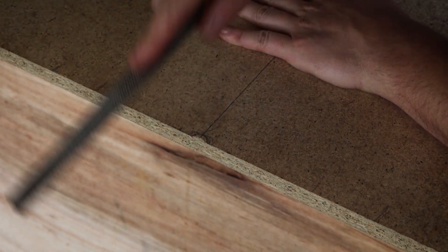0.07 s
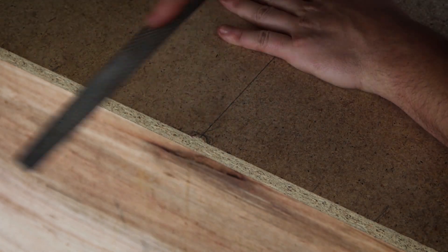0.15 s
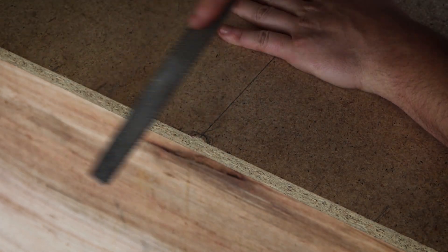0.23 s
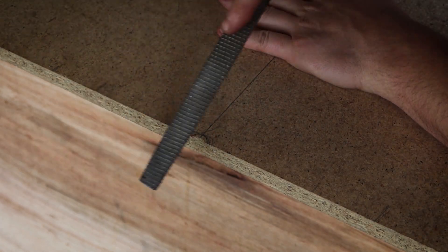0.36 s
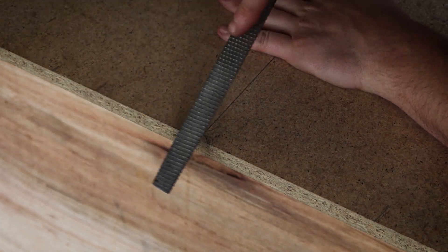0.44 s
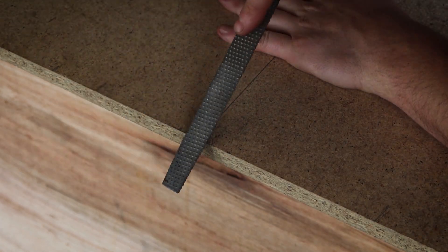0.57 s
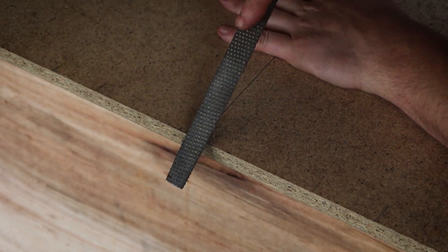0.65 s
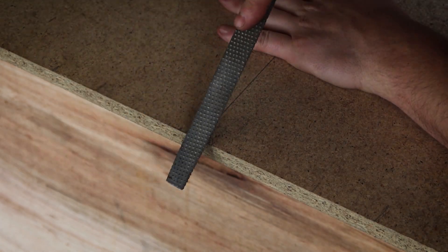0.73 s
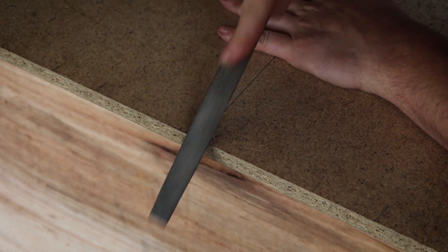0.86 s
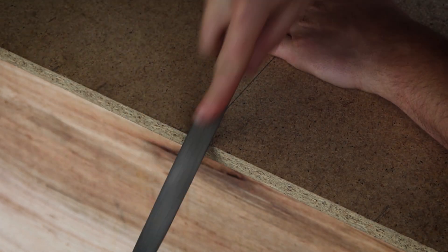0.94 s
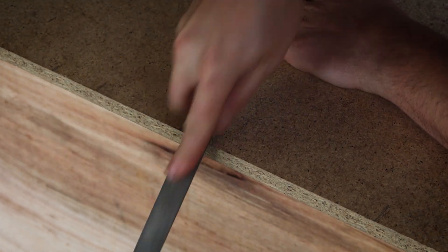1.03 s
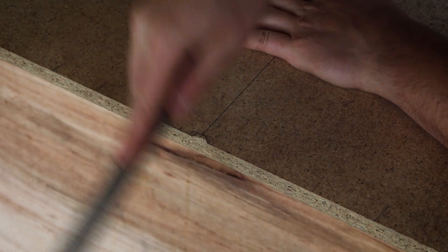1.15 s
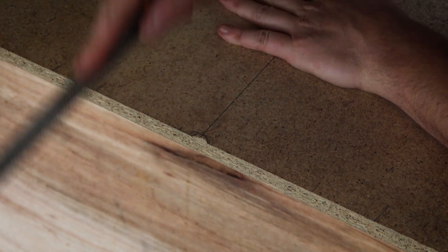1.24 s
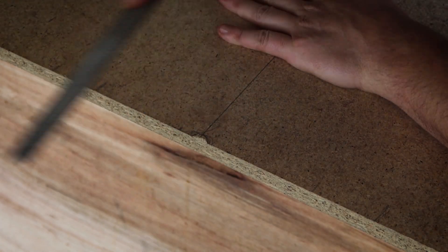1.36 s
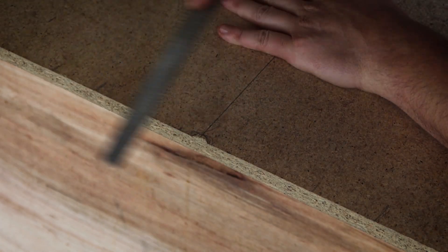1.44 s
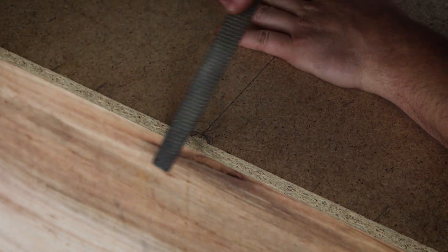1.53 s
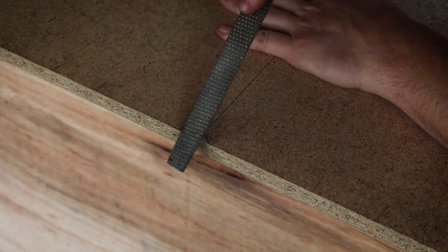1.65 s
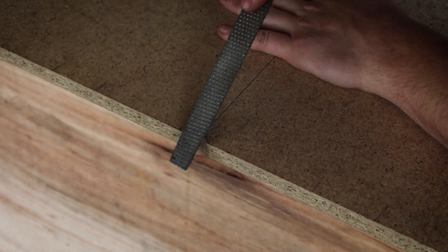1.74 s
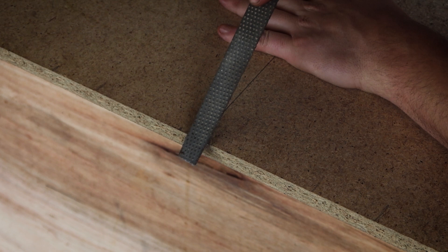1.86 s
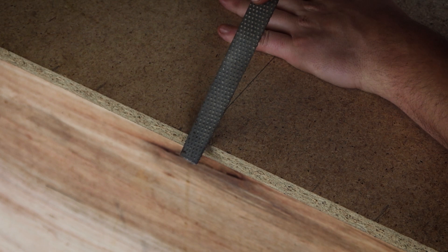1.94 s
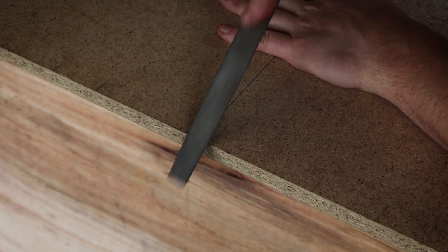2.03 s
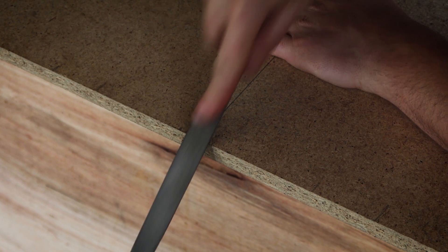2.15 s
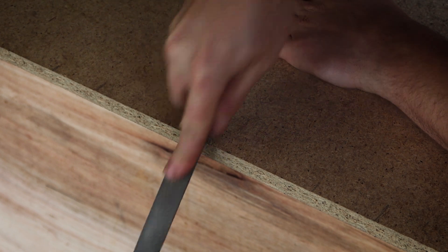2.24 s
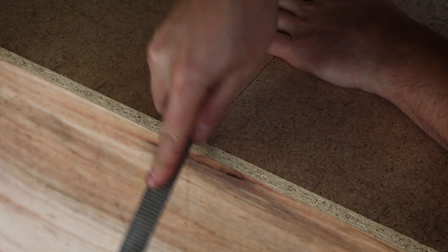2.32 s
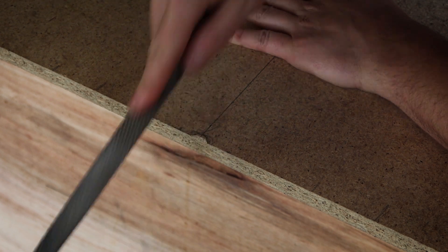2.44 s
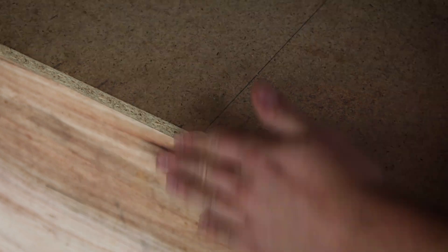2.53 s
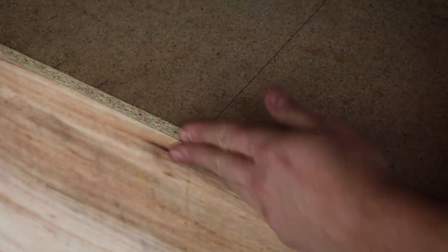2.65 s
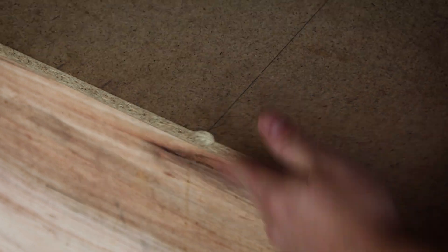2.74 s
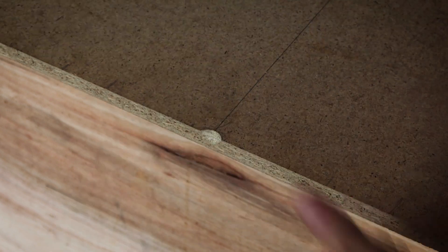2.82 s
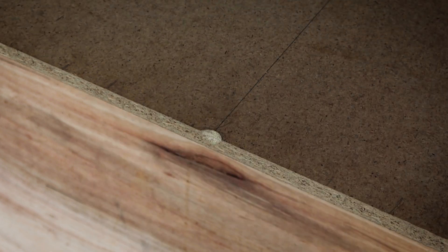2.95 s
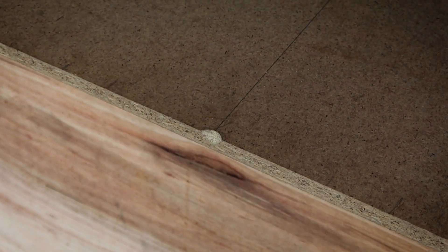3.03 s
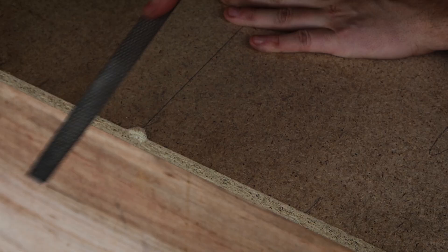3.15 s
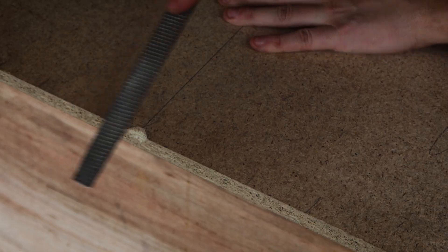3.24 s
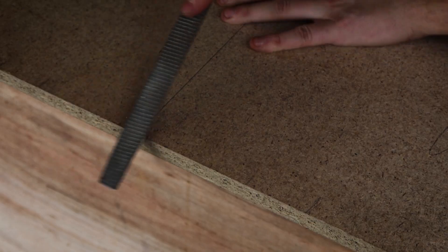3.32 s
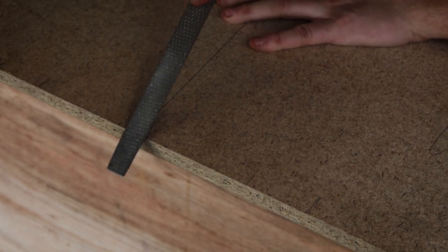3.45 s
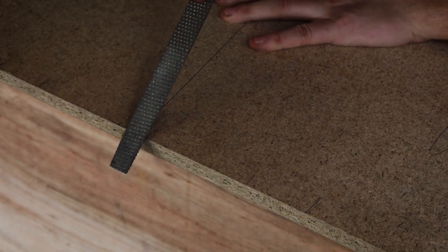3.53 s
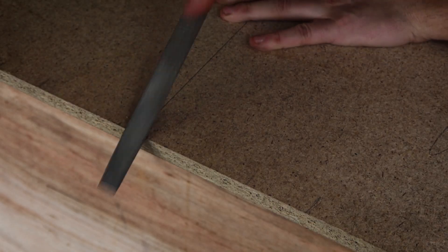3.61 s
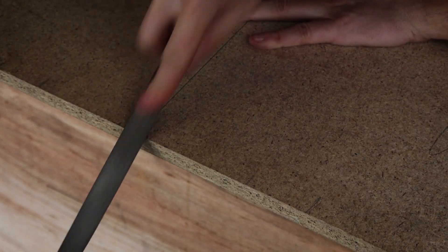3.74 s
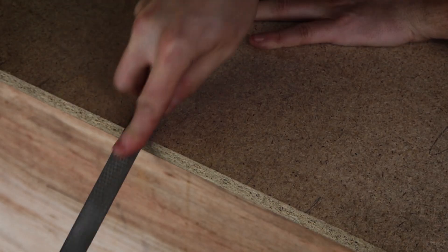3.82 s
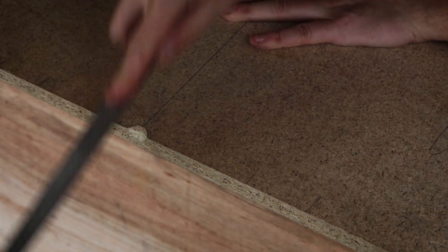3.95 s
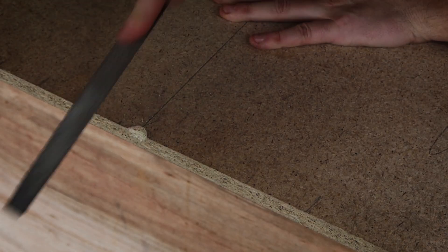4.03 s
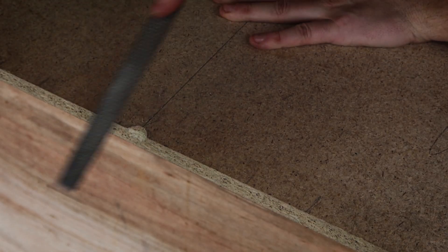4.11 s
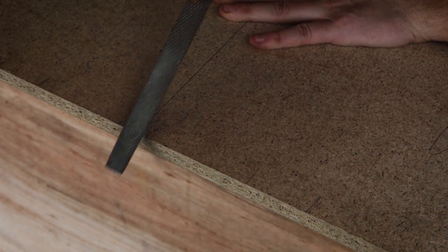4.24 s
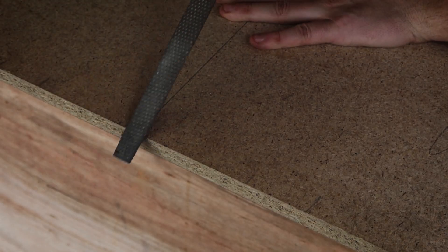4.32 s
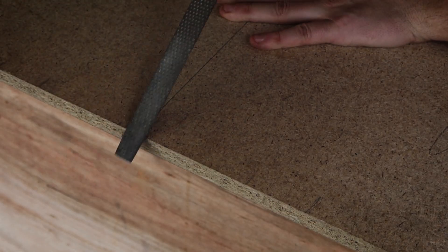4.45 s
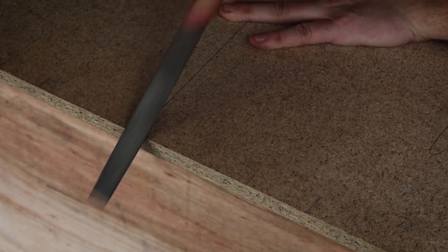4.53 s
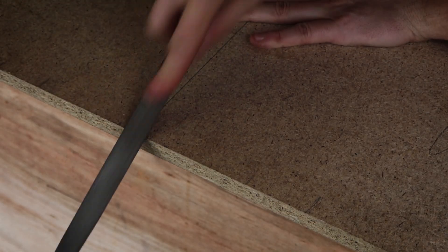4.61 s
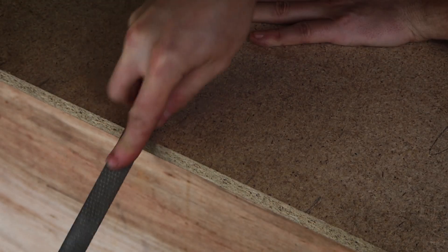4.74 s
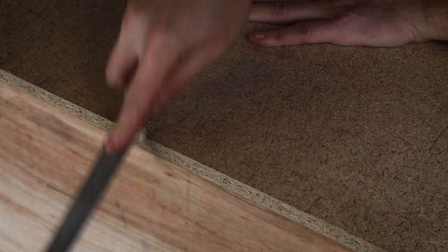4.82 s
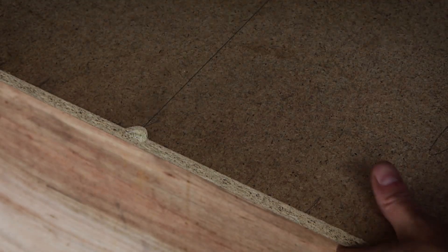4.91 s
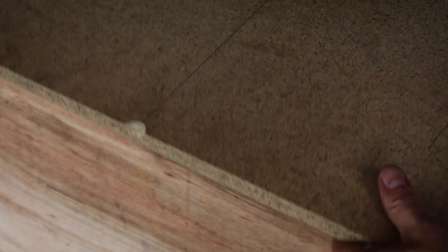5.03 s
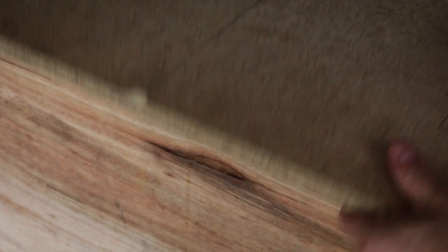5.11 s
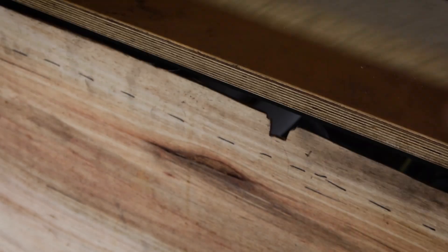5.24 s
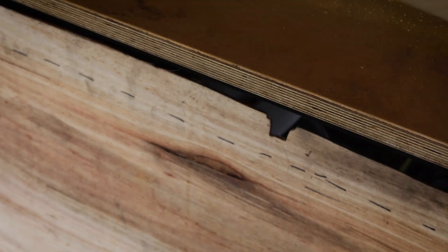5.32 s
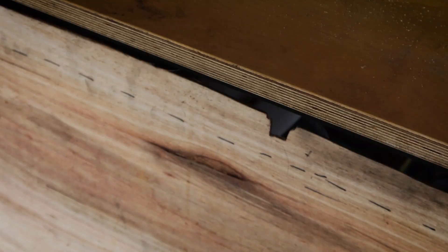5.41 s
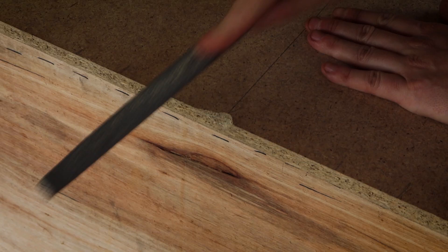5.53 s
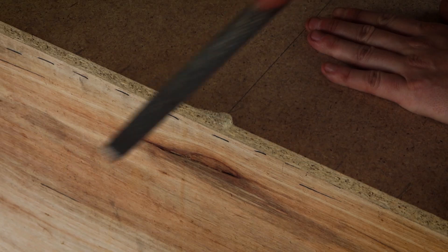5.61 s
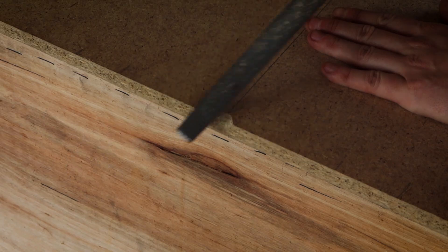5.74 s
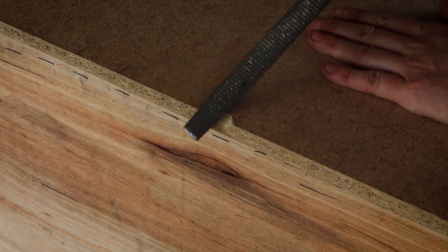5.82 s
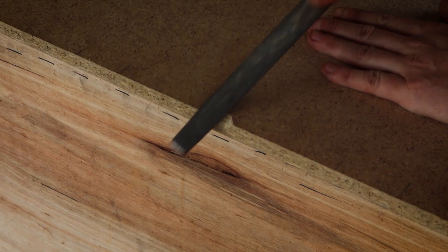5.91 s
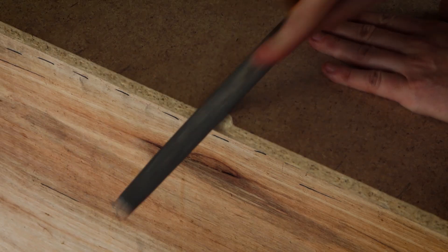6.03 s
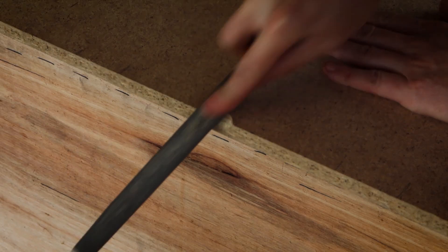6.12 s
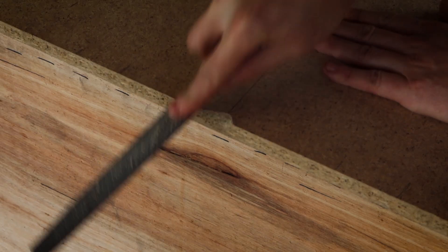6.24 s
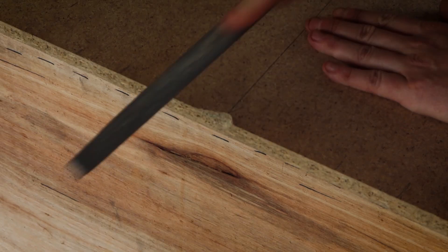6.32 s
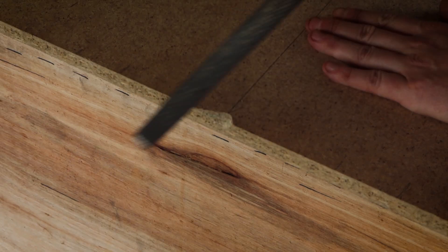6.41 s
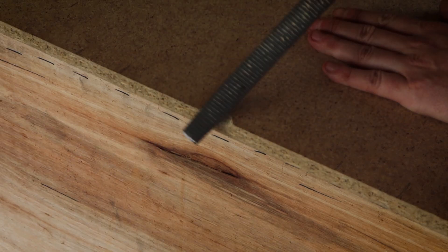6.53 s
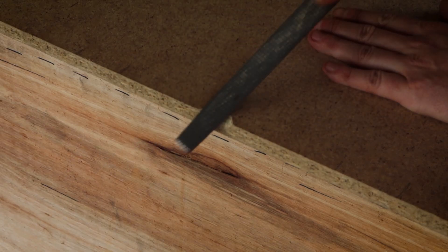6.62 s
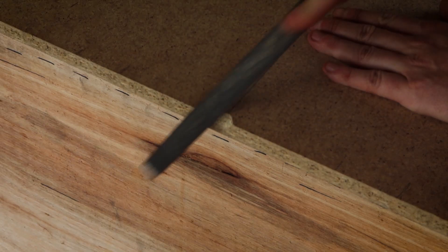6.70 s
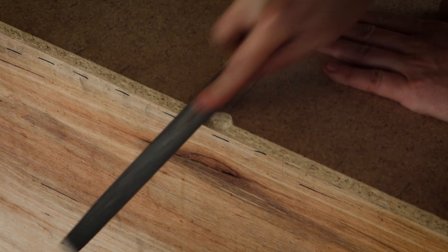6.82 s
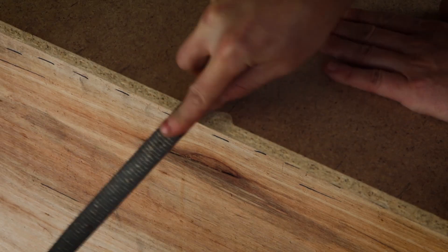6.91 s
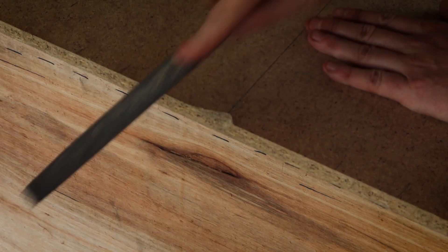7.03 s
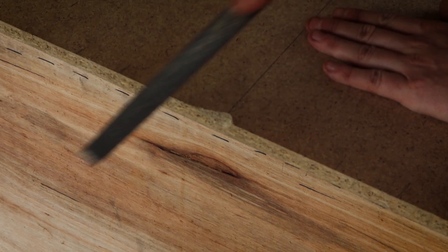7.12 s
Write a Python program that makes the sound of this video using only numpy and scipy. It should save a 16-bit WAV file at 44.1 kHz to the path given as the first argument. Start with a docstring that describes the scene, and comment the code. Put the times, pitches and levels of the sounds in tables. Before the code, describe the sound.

Close up in a small workshop with low room air and a faint thin electrical whine, the end of a rasp stroke cuts off at 0 s. Light touches and a faint drag at 0.6-0.8 lead to a loud, gritty stroke at 0.9-1.15, teeth buzzing and wood crunching, the blade's low hum sinking. Small taps and scuffs from 1.75 precede a second stroke at 2.05-2.35. A small clack at 2.64, a short slide, and a hard bright clack at 2.85 put the tool down. A scuff at 3.2 and a sharp knock at 3.44 lead to strokes at 3.65 and 4.55, ending in a dull thump. Another clack at 4.97, then rubbing, hissing slides and hollow bumps from 5.1 to 5.7. A clack at 5.86 and a light drag introduce two more irregular, tearing strokes at 5.95 and 6.7, the last fading into brief reverberation by about 7.1.

```python
"""Hand rasp on a board edge

A coarse hand rasp is set on the edge of a wooden board and pushed across it in six strokes, in a small workshop;
the tail of an earlier stroke opens the scene. Rows of teeth knock the board, crush the wood, snap its fibres and
set the blade humming. Twice the rasp is put down on the bench, and things slide, bump and tick there.
The close microphone overloads on the hardest blows and adds a faint electrical whine."""
import sys
import numpy as np
from scipy import signal
from scipy.fft import rfft, irfft
from scipy.io import wavfile
from scipy.ndimage import uniform_filter1d

SR = 44100
rng = np.random.default_rng(int(sys.argv[2]) if len(sys.argv) > 2 else 0)


def dump_mix(stems):
    """Bounce the given channels to the path in sys.argv[1] as a 16-bit WAV at rate SR."""
    frames = np.atleast_2d(stems).T  # one column per channel
    limited = np.clip(frames, -1, 1)  # hard clip at full scale
    pcm = np.round(limited * 32767).astype(np.int16)
    wavfile.write(sys.argv[1], SR, pcm)


N = 315976  # samples

EDGE_HZ = 16000  # upper band limit
TAPS = 8192  # samples, the grid on which colours are drawn
HZ = np.fft.rfftfreq(TAPS, 1 / SR) + 1
BLOW = np.sqrt(SR / 100)  # gives a response of energy 1 an rms of 1 over 10 ms
TOUCH_S = .003  # the rasp's touch sets in and lets go this quickly
COAST_S = .025  # the rasp has slowed to a crawl this long after the hand lifts
# moving level of the background: time_s [s], air_db [dB], whine_db [dB]
BACKGROUND_LEVELS = [(0, 2, 0), (1.7, 2.5, 1), (3.3, 3.5, 1.5), (3.899, -2, -12), (4.3, -0.5, -3.5),
                     (7.16, -2, -5)]


def amp(db):
    """Decibels to gain."""
    return 10 ** (np.asarray(db) / 20)


def evened(x):
    """Scales to rms 1."""
    return x / np.sqrt(np.mean(x ** 2) + 1e-20)


def read(points, hz):
    """Reads a curve of (Hz, value) points on a log-frequency axis."""
    f, value = np.transpose(points)
    return np.interp(np.log(hz + 1), np.log(f + 1), value)


def add(mix, s, sound):
    """Adds a sound at a time in seconds."""
    part = mix[max(round(s * SR), 0):][:len(sound)]
    part += sound[:len(part)]


def gate(t, attack_s, release_s):
    """Straight attack, hold and release."""
    return np.clip(np.minimum(t / attack_s, (t[-1] - t) / release_s), 0, 1)


def below(hz, order=4):
    """Low-pass slope in dB."""
    return -10 * np.log10(1 + (HZ / hz) ** (2 * order))


def above(hz, order=4):
    """High-pass slope in dB."""
    return -10 * np.log10(1 + (hz / HZ) ** (2 * order))


def resonances(modes, narrowest_hz=45):
    """Peaks and gaps in dB, none narrower than the limit."""
    return sum(lift_db / (1 + (2 * (HZ - hz) / max(width_hz, narrowest_hz)) ** 2)
               for hz, width_hz, lift_db in modes)


def ring(db):
    """Causal (minimum-phase) impulse response of energy 1 with the given colour."""
    log_gain = np.log(amp(np.maximum(db - db.max(), -100)))
    circle = np.concatenate([log_gain, log_gain[-2:0:-1]])
    response = np.fft.ifft(np.exp(np.conj(signal.hilbert(circle)))).real[:TAPS // 2]
    return response / np.linalg.norm(response)


def clicks(count, per_s, spread_db):
    """Random clicks of uneven size."""
    sizes = amp(spread_db * np.clip(rng.standard_normal(count), -2.5, 2.5))
    return (rng.random(count) < per_s / SR) * sizes


def signed_clicks(count, per_s, spread_db):
    """Random clicks that push either way."""
    return clicks(count, per_s, spread_db) * rng.choice([-1, 1], count)


def clumps(count, depth_db, size):
    """A gain that catches and lets go at random, in clumps of the given size in samples."""
    drift = evened(uniform_filter1d(rng.standard_normal(count), size))
    return evened(amp(depth_db * np.clip(drift, -2, 2)))


def steadied(x, size=2200):
    """Evens out the level over a few hundredths of a second (size in samples)."""
    return x / np.sqrt(abs(uniform_filter1d(x ** 2, size)) + 0.012 * np.mean(x ** 2) + 1e-12)


def room_air(t):
    """Low room air: noise with a dark colour, its level drifting."""
    # colour of the air: hz [Hz], level_db [dB]
    air_colour = [(15, -40.5), (25, -15), (45, -1.5), (111, -0.5), (137, -9.5), (190, -5), (326, -5.5),
                  (373, -7.5), (463, -12.5), (545, -10), (1160, -23), (2990, -29.5), (16000, -47)]
    time_s, air_db, _ = np.transpose(BACKGROUND_LEVELS)
    colour = amp(read(air_colour, np.fft.rfftfreq(N, 1 / SR)))
    air = evened(irfft(rfft(rng.standard_normal(N)) * colour, N))
    return air * amp(-51 + np.interp(t, time_s, air_db))


def electrical_whine(t, whine_hz=500):
    """The thin electrical whine of the microphone: steady harmonics of random phase, swelling and sinking."""
    # partials of the whine: hz [Hz], level_db [dB rms before the moving level]
    partials = [(500, -85), (1500, -77), (3000, -78), (6000, -80), (8000, -85), (9500, -93), (15000, -99)]
    time_s, _, whine_db = np.transpose(BACKGROUND_LEVELS)
    whine = np.sqrt(2) * sum(amp(read(partials, hz)) * np.sin(2 * np.pi * (hz * t + rng.random()))
                             for hz in np.arange(whine_hz, EDGE_HZ, whine_hz))
    return whine * amp(np.interp(t, time_s, whine_db))


def room(x, delay_s=0.011):
    """Dense reflections of random sign, each band dying at its own speed."""
    # reverberation time: hz [Hz], t60_s [s]
    decay_times = [(150, 0.41), (400, 0.37), (1000, 0.52), (2800, 0.62), (7000, 0.42), (15000, 0.26)]
    # colour of the reverberation: hz [Hz], level_db [dB]
    tail_colour = [(80, 8.5), (300, 4.5), (900, 1.5), (2500, -3), (5000, -3), (9000, -3), (16000, -2)]
    taps = rng.choice([-1., 1.], SR) * (rng.random(SR) < 4000 / SR)
    taps = taps * (np.arange(SR) > delay_s * SR)
    hz, t, bands = signal.stft(taps, SR, nperseg=256)
    t60_s = read(decay_times, hz)[:, None]
    fading_db = read(tail_colour, hz)[:, None] - 60 * t / t60_s
    tail = signal.istft(bands * amp(fading_db), SR, nperseg=256)[1]
    scale = np.linalg.norm(taps * amp(-60 * np.arange(SR) / SR / t60_s.max()))
    return signal.fftconvolve(x, tail / scale)[:N]


def slides():
    """Things slide over the bench: clumped grains of friction rub and hiss, growing until they stop."""
    # slides: start_s [s], length_s [s], rub_db [dB before the swell], hiss_db [dB before the swell],
    # rub_tilt [dB per octave]
    slide_events = [(2.745, 0.11, -36, -42.5, -1.5), (3.193, 0.0762, -40.5, -48, -2.5),
                    (3.285, 0.16, -56, -56, 2), (5.136, 0.0817, -36, -47, -5.5),
                    (5.211, 0.085, -25, -61.5, 4), (5.28, 0.156, -24.5, -48, 2),
                    (5.426, 0.149, -51, -46.5, -4.5), (5.565, 0.061, -33.5, -47, 1),
                    (5.615, 0.0964, -41.5, -59, 1)]
    # colour of the rubbing: hz [Hz], level_db [dB]
    rub_colour = [(100, -26), (300, 5), (500, 6), (850, -4), (1300, -3), (1700, -7.5), (2100, -6.5),
                  (2900, -16), (3400, -17), (4500, -33.5), (7000, -44), (16000, -74.5)]
    # colour of the hiss: hz [Hz], level_db [dB]
    hiss_colour = [(2000, 0.5), (4500, -3.5), (7000, -8), (11000, -12.5), (16000, -22.5)]
    # resonances of the sliding thing: hz [Hz], width_hz [Hz], lift_db [dB]
    rub_modes = [(470, 90, -2.5), (1498, 200, 4.5), (1970, 240, -6), (2395, 140, 4), (2800, 170, 4.5),
                 (3370, 540, -6)]
    growth_db, start_s, stop_s, tilt_pivot_hz = 6.5, 0.0179, 0.015, 1000
    out = np.zeros(N)
    for s, length, rub_db, hiss_db, tilt in slide_events:
        age = np.arange(0, length, 1 / SR)
        swell = gate(age, start_s, stop_s) * amp(growth_db * (age / length - 1.5))
        swell = swell * clumps(len(age), depth_db=1.0, size=500)
        rub = read(rub_colour, HZ) + resonances(rub_modes) + tilt * np.log2(HZ / tilt_pivot_hz)
        for db, colour in ((rub_db, rub), (hiss_db, read(hiss_colour, HZ))):
            grains = evened(signed_clicks(len(age), 5000, 4.4))
            add(out, s, amp(db) * signal.fftconvolve(swell * grains, ring(colour)))
    return out


def bumps():
    """Dull bumps ring in the board or bench: single decaying sines with a softened start."""
    # bumps: start_s [s], level_db [dB], pitch_hz [Hz], t60_s [s]
    bump_events = [(2.845, -38.5, 71.6, 0.26), (3.69, -20, 102, 0.107), (4.821, -17.5, 86.7, 0.094),
                   (5.116, -22.5, 76, 0.11), (5.162, -28, 260, 0.064), (5.18, -20, 276, 0.067),
                   (5.192, -27, 136.2, 0.093), (5.385, -26, 178, 0.037), (5.419, -19, 486, 0.082)]
    out, t = np.zeros(N), np.arange(SR // 3) / SR
    for s, db, hz, t60 in bump_events:
        onset = 1 - np.exp(-t / 0.0004)
        add(out, s, amp(db - 60 * t / t60) * onset * np.sin(2 * np.pi * hz * t))
    return out


def ticks(width_hz=1300):
    """Small sharp ticks: impulses through one broad resonance."""
    # ticks: start_s [s], level_db [dB rms over 10 ms], pitch_hz [Hz]
    tick_events = [(.448, -44, 6300), (2.639, -52.5, 4960), (2.91, -64, 6500), (5.117, -58, 5610),
                   (5.177, -57.5, 6000), (5.492, -54, 5750)]
    out = np.zeros(N)
    for s, db, hz in tick_events:
        peak = -15 * np.log10(1 + (2 * (HZ - hz) / width_hz) ** 2)
        add(out, s, amp(db) * BLOW * ring(peak))
    return out


def put_down(rattle_t60=0.035, rattle_db=-1):
    """Steel strikes the bench: a clack, a brief dense rattle and a few wooden modes, all softened by the blow."""
    # the rasp is put down or picked up and rattles: start_s [s], clack_db [dB], bright_hz [Hz],
    # ring_db [dB], pitch [factor on the bench's modes]
    clacks = [(2.639, -24, 696, -16, 1.016), (2.6463, -26, 633, -41, 1), (2.688, -40, 1299, -43, 2.15),
              (2.8417, -12, 2313, -21, 0.92), (2.8452, -10.5, 2360, -13.5, 0.84),
              (2.872, -24.5, 2000, -30, 0.81), (2.878, -23, 1800, -35, .88), (4.9619, -18, 2340, -14.5, 1),
              (4.9668, -14.5, 2040, -25, 1.2), (4.9872, -25, 1000, -26, 1), (5.161, -38, 900, -48, 1.14),
              (5.861, -22, 1480, -27, 1.18)]
    # colour of the bench: hz [Hz], level_db [dB]
    bench_colour = [(40, -46.5), (90, -2.5), (220, -18), (380, 8), (800, 0.5), (1250, 3.5), (1700, -0.5),
                    (2500, -5), (3400, -17), (6000, -20), (16000, -13.5)]
    # modes of the bench: hz [Hz before the pitch factor], level_db [dB before softening], t60_s [s]
    bench_modes = [(480, 0.5, 0.22), (590, -6, 0.13), (914, -17.5, .14), (1062.7, -13.5, 0.18),
                   (1194, -32.5, .13), (1390, -19, .13), (1540, -21, .12)]
    out, t = np.zeros(N), np.arange(SR // 3) / SR
    for s, db, bright_hz, ring_db, pitch in clacks:
        chatter = rng.standard_normal(len(t)) * amp(-60 * t / rattle_t60)
        contact = (t == 0) + amp(rattle_db) * chatter / np.linalg.norm(chatter)
        blow = ring(read(bench_colour, HZ) + below(bright_hz, order=2))
        add(out, s, amp(db) * BLOW * signal.fftconvolve(contact, blow))
        modes = 0
        for hz, level, t60 in bench_modes:
            softening = np.hypot(1, hz / bright_hz)
            modes = modes + amp(level - 60 * t / t60) * np.sin(2 * np.pi * hz * pitch * t) / softening
        add(out, s, amp(ring_db) * modes * (1 - np.exp(-t * bright_hz)))
    return out


def board(modes, knock_hz=900, snap_hz=3200, shudder_hz=160):
    """How the board answers to a tooth's knock, crushed wood and a snapping fibre, and the bench's shudder."""
    # colour of the board: hz [Hz], level_db [dB]
    board_colour = [(30, -25.5), (70, -14.5), (110, -2), (175, -13.5), (250, 4), (420, 5.5), (760, 1),
                    (950, -10), (1900, -17), (3500, -29.5), (6000, -38), (9000, -43), (12000, -51.5),
                    (16000, -60)]
    # no resonance or gap is very narrow, so the board's ring is short
    db = read(board_colour, HZ) + resonances(modes)
    knock = above(shudder_hz) + below(knock_hz)
    crunch = above(knock_hz) + below(snap_hz)
    return [ring(db + part) for part in (knock, crunch, above(snap_hz), below(shudder_hz))]


def blade(length, db, last_hz):
    """The teeth shake the overhanging blade, whose bending note sinks as more of it overhangs the edge."""
    fall_oct_per_s, pole_width_hz, rise_s, fade_s = 7.5, 14.7, 0.099, .05
    t = np.arange(0, length + fade_s, 1 / SR)
    turns = np.cumsum(last_hz * 2 ** (fall_oct_per_s * (length - t))) / SR
    pole, shaking = np.exp(-np.pi * pole_width_hz / SR), rng.standard_normal((2, len(t)))
    # a slow complex wander, shifted up to the gliding note
    swing = signal.lfilter([1], np.poly([pole, pole]), shaking[0] + 1j * shaking[1])
    hum = evened(steadied((swing * np.exp(2j * np.pi * turns)).real))
    return amp(db) * gate(t, rise_s, fade_s) * hum


def drag(length, knock_db, crunch_db, fade_db):
    """Gains of knock, crunch and snap for a touch that fades or grows evenly in dB."""
    t = np.arange(0, length, 1 / SR)
    snap_db = crunch_db - 15
    return [amp(db - fade_db * t / length) * gate(t, TOUCH_S, TOUCH_S) for db in (knock_db, crunch_db, snap_db)]


def stroke(lean_s, length, knock_db, crunch_db, snap_db, easing_db, hardest, snap_fall_db_per_s):
    """Gains of knock, crunch and snap: the hand leans in, the cut swells, the hand eases off, the rasp slides off."""
    lean_db, slide_off_s = 33, .11  # depth at which a stroke begins; time until the rasp is clear of the edge
    # how much weaker (knock, crunch, snap) are at the slow ends of a stroke [dB]
    arches_db = (1, 8, 8)
    # how fast (knock, crunch) die away as the hand lifts [dB/s]
    slide_off_db_per_s = (166.5, 217)
    t = np.arange(0, length + slide_off_s, 1 / SR)
    along, hardest = np.minimum(t / length, 1), np.clip(hardest, .1, .9)
    lean = -lean_db * np.maximum(1 - t / lean_s, 0) ** 2
    slowness = ((along - hardest) / max(hardest, 1 - hardest)) ** 2
    levels = (knock_db - easing_db * along, crunch_db, snap_db)
    falls = (*slide_off_db_per_s, snap_fall_db_per_s)
    lifted_s = np.maximum(t - length, 0)
    return [amp(db + lean - arch * slowness - fall * lifted_s) * gate(t, TOUCH_S, TOUCH_S)
            for db, arch, fall in zip(levels, arches_db, falls)]


def scrape(gains, moving_s, tooth_hz, shudder_db, stray, tearing, body):
    """Tooth rows hit the edge faster in mid-stroke; each bite lets go a burst of breaking fibres."""
    slowest, wobble = .35, .08  # share of full speed; relative jitter of speed
    uneven_db, stray_per_s, grain_db, fibre_db, thrust = 1.5, 420, 2.0, 4, 0.54
    knock, crunch, snap = gains
    count = len(knock)
    progress = np.minimum(np.arange(count) / SR / moving_s, 1)
    speed = slowest + (1 - slowest) * np.sqrt(abs(np.sin(np.pi * progress)))
    jitter = evened(uniform_filter1d(rng.standard_normal(count), size=200))
    turns = np.cumsum(tooth_hz * speed * np.maximum(1 + wobble * jitter, 0)) / SR
    # one impulse as each row passes, joined by stray teeth
    row_sizes = amp(uneven_db * np.clip(rng.standard_normal(count), -2, 2))
    teeth = evened(np.diff(np.floor(turns), prepend=0) * row_sizes)
    stray = np.clip(stray, 0, 1)
    stray_teeth = evened(clicks(count, stray_per_s, uneven_db))
    force = steadied(np.sqrt(1 - stray) * teeth + np.sqrt(stray) * stray_teeth, size=1300)
    # a bite tears for under 2 ms, with some steady tearing in between
    bite = tearing + evened(signal.lfilter([1], [1, -np.exp(-1 / (.0018 * SR))], force))
    crushing = steadied(thrust * force + evened(bite * signed_clicks(count, 4000, grain_db)))
    snapping = bite * clumps(count, depth_db=2.0, size=220) * signed_clicks(count, 10000, fibre_db)
    fibres = steadied(snapping)
    push = uniform_filter1d(force, size=900) - force  # only the unsteady part of the force sounds
    # whole rows shake the heavy bench most
    heave = 1.52 * push + uniform_filter1d(teeth, size=900) - teeth
    drives = (push * knock, crushing * crunch, fibres * snap, heave * knock * amp(shudder_db))
    return sum(signal.fftconvolve(drive, response) for drive, response in zip(drives, body))


def rasp(echo=0.1655):
    """Strokes, drags and landings all sound through the board as it is held at that time."""
    # strokes: start_s [s], lean_s [s], length_s [s], knock_db [dB], crunch_db [dB], snap_db [dB],
    # easing_db [dB lost by the end], hardest [share of the length, 0-1], snap_fall [dB/s],
    # tooth_hz [tooth rows a second at full speed, Hz], shudder_db [dB], stray [share of stray teeth, 0-1],
    # tearing [steady tearing between bites, 0-1], blade_db [dB], blade_hz [Hz as the hand lifts]
    strokes = [(0.885, 0.044, 0.24, -7.5, -18, -26, 10.5, 0.64, 650, 215, -17, 0.64, 0.51, -36, 81.9),
               (2.064, 0.057, 0.29, -7, -18.5, -26.5, 13, 0.58, 1603, 208.1, -20.5, 0.59, 0.2, -34, 74.3),
               (3.647, 0.044, 0.23, -9.5, -17, -26, 8.5, 0.62, 558, 240.1, -19.5, 0.72, .5, -28.5, 100.1),
               (4.538, 0.0728, 0.24, -7, -16, -25.5, 13.5, .42, 420, 256.7, -25.5, 0.41, 0.31, -34.5, 112.5),
               (5.963, 0.0667, 0.26, -10, -19, -27.5, 6.5, 0.64, 396.5, 96.4, -26.5, 0.87, 1, -32, 66.3),
               (6.706, 0.08, 0.24, -9.5, -16.5, -24.5, 8, 0.71, 1398.5, 98.2, -18, 0.91, 1, -34.5, 62)]
    # the tail of a stroke at the start, then light drags of the rasp on the edge: start_s [s], length_s [s],
    # knock_db [dB], crunch_db [dB], fade_db [dB lost by the end, negative grows]
    drags = [(0, 0.028, -10, -23.5, 29), (0.021, 0.15, -33, -36, 18.5), (0.588, 0.1, -36.5, -56, 11),
             (0.737, 0.068, -40.5, -55.5, 16), (1.75, 0.079, -29, -50, 22),
             (1.864, 0.0787, -38, -50.5, 0.5), (1.946, .04, -34, -46, 4), (2.055, 0.042, -47, -54, -19),
             (3.461, 0.17, -30.5, -40, 11.5), (4.384, 0.11, -35, -38, 22), (5.835, 0.0534, -34, -33, 0.5),
             (5.883, 0.14, -39.5, -43.5, -8), (6.665, 0.076, -32, -44, -1)]
    # the rasp lands on the edge or a tooth catches: start_s [s], knock_db [dB], crunch_db [dB], snap_db [dB]
    landings = [(0.596, -39, -70.5, -66), (0.631, -35, -66, -75), (0.869, -34.5, -43, -50.5),
                (0.89, -27.5, -42, -54), (0.911, -17, -37, -50.5), (1.741, -24.5, -44, -75),
                (1.883, -40, -69, -68), (1.919, -43, -45, -72), (1.95, -29.5, -60, -63),
                (2.094, -27, -33, -36), (2.351, -21, -33.5, -47.5), (3.397, -49, -57.5, -54),
                (3.443, -10.5, -18, -37), (3.488, -28, -52, -66), (3.674, -18, -41, -30.5),
                (4.377, -19, -31.5, -54.5), (4.561, -19, -41, -44), (4.822, -24.5, -35.5, -45.5),
                (6.003, -22, -32, -47), (6.663, -22.5, -42.5, -49), (6.967, -26, -38, -40)]
    # resonances and gaps of board and rasp, one list for each hold: hz [Hz],
    # width_hz [Hz before the narrowest limit], lift_db [dB]
    board_modes = [
        [(215, 180, 4.5), (430, 230, 2.5), (514, 19, -6.5), (672, 21, 2.5), (832.7, 37, -14), (1039, 18, -10),
         (1307, 17, 4.5), (1505, 70, -7.5), (2095, 38, -8), (2525, 73, -12.5), (2916, 920, -4), (3430, 270, 5),
         (5060, 440, 3), (5170, 120, -24), (5570, 200, 4)],
        [(274.9, 21, 3), (322, 35, -12), (510, 35, -9.5), (732, 1350, -1.5), (1442, 38, -9), (1556, 36, 4.5),
         (1865, 27.3, -6.5), (2110, 134, 9), (2456, 326, -0.5), (2690, 180, -9), (2961, 155, 7.5),
         (3607, 81, -10), (4468, 140, -7.5), (6300, 120, -5), (6680, 170, 5.5)],
        [(303, 40, 8.5), (432.2, 24, 10.5), (826, 55, -15), (1444, 53, 7), (1483, 60.5, -19), (1790, 240, 5.5),
         (1990, 46.3, -14.5), (2250, 53, -3.5), (3090, 270, 9), (3252, 147, -9.5), (4216, 530, 7),
         (4417, 93, -16), (5100, 100, -4), (5606, 101, -19.5), (7190, 236, -10.5)],
    ]
    # the work is moved and held anew at these times: time_s [s]
    moves = (3.0, 5.5)
    out, bodies = np.zeros(N), [board(modes) for modes in board_modes]
    for s, *effort, tooth_hz, shudder_db, stray, tearing, blade_db, blade_hz in strokes:
        length, body = effort[1], bodies[np.searchsorted(moves, s)]
        add(out, s, scrape(stroke(*effort), length + COAST_S, tooth_hz, shudder_db, stray, tearing, body))
        add(out, s, blade(length, blade_db, blade_hz))
    for s, *touch in drags:
        body = bodies[np.searchsorted(moves, s)]
        add(out, s, scrape(drag(*touch), moving_s=touch[0], tooth_hz=88.13, shudder_db=-8.5,
                           stray=0.46, tearing=0.82, body=body))
    for s, *levels in landings:
        body = bodies[np.searchsorted(moves, s)]
        add(out, s, -BLOW * sum(amp(db) * response for db, response in zip(levels, body)))
    # one early echo comes back inverted and ripples the colour about every 105 Hz
    add(out, .00948, -echo * out)
    return out


def scene(rasp_room_db=-11, bench_room_db=-7):
    """The rasp is close to the microphone; the bench top is farther off and wetter."""
    t = np.arange(N) / SR
    background = room_air(t) + electrical_whine(t)
    far = slides() + bumps() + ticks() + put_down()
    near = rasp()
    reverb = room(amp(rasp_room_db) * near + amp(bench_room_db) * far)
    return (near + far + reverb + background)[None]


def record(dry, low_cut_hz=48):
    """The microphone drops the deepest bass and overloads on the loudest peaks; then the band limit."""
    dry = signal.sosfilt(signal.butter(2, low_cut_hz, "highpass", fs=SR, output="sos"), dry)
    clipped = dry / (1 + dry ** 8) ** (1 / 8)
    band_limit = signal.firwin(511, EDGE_HZ, window=("kaiser", 9), fs=SR)
    return signal.oaconvolve(clipped, band_limit[None], "same")


dry = scene()
out = record(dry)
dump_mix(out)
```